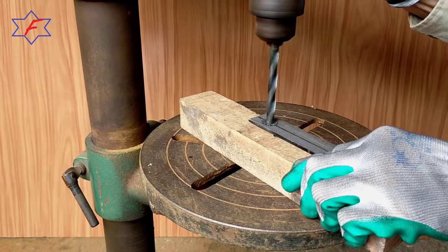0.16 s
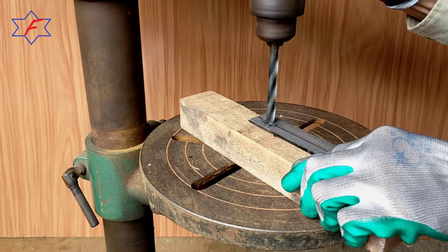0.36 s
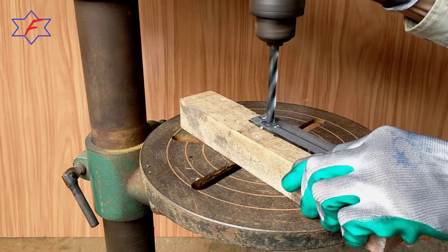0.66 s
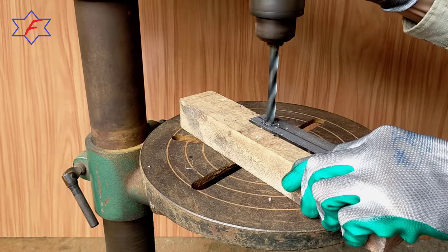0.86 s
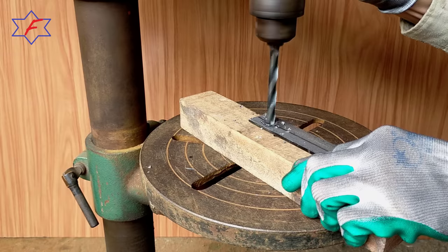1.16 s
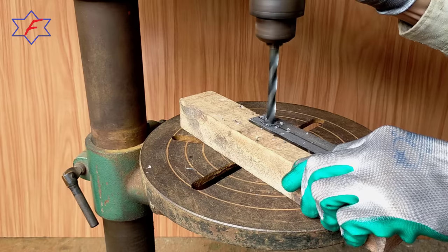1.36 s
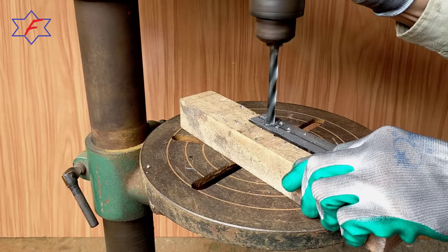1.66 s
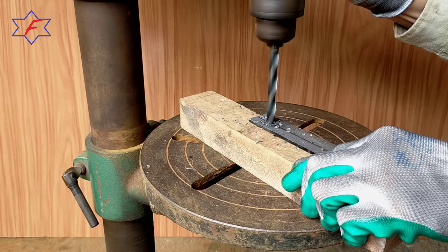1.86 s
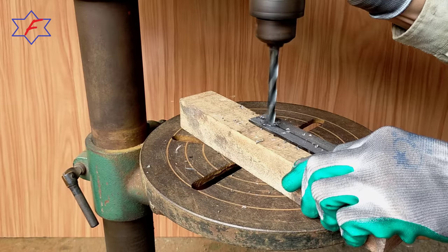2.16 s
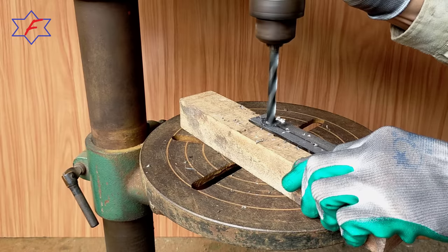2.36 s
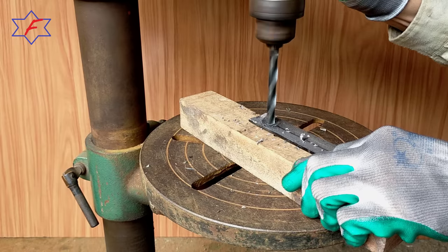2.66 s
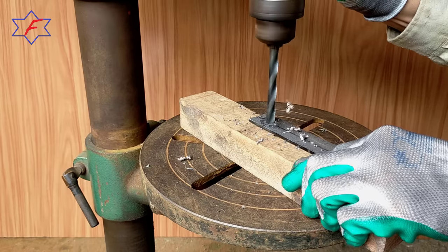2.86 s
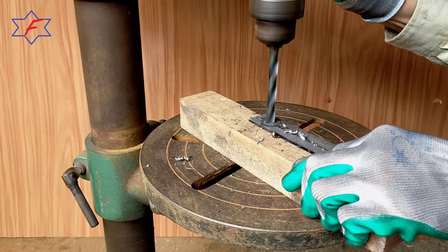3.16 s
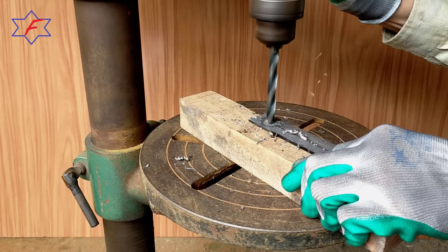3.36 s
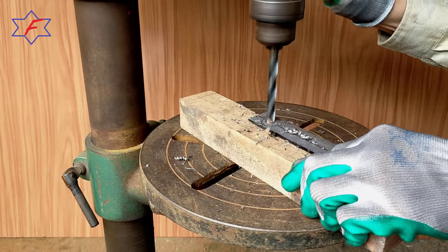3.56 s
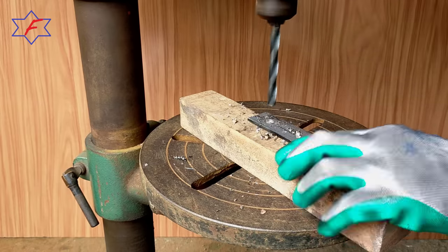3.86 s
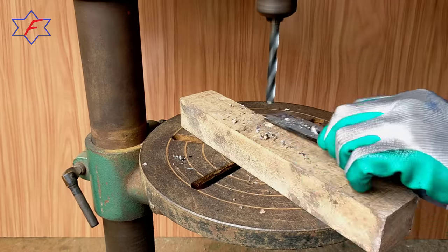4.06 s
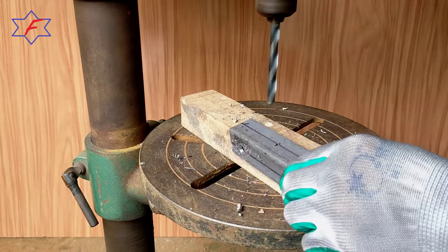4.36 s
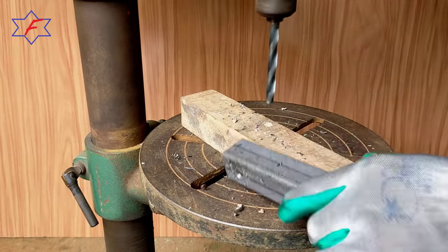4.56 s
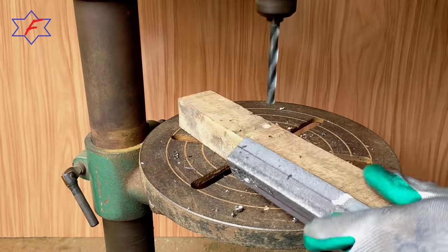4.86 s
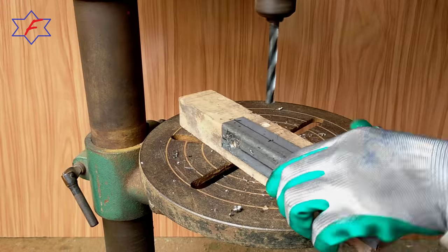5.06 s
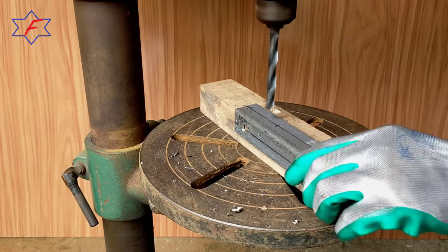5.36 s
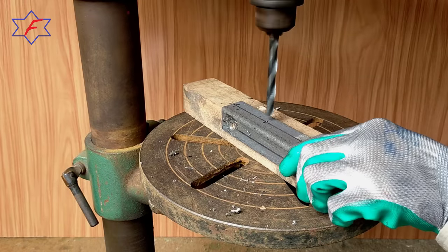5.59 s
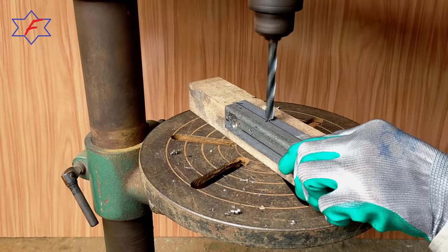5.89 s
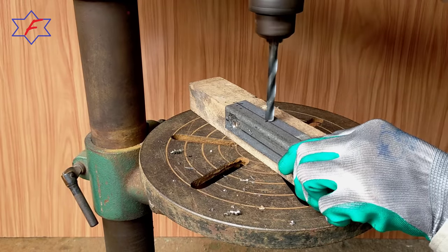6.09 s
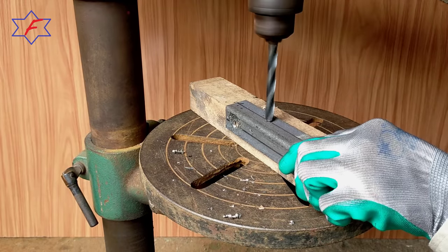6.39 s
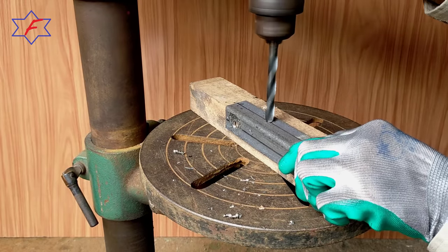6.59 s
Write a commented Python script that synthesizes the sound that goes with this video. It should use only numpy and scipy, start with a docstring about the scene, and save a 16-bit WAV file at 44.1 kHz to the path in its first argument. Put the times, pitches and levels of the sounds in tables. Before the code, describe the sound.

Close up, a drill press knocks and drones rapidly while its bit sizzles into steel, screeches at breakthrough, and keeps rattling freely afterwards.

```python
"""A belt-driven drill press: its loose pulley knocks and its motor ticks once a turn, as random draws
ringing through modal filters, and the knocks throb as the two shafts drift in and out of step.
The guard rattles and the housing drones and sings; noise and rough tones make the bit hiss, squeak and scrape
in a steel bar. The machine then rattles on under little load, and the bar is set down with a chink.
Near walls answer with short decaying noise echoes; low-pitched noise puffs brush one close microphone."""
import sys
import numpy as np
from scipy import signal
from scipy.fft import rfft, irfft, next_fast_len
from scipy.io import wavfile
from scipy.ndimage import uniform_filter1d, map_coordinates

SR = 44100
rng = np.random.default_rng(int(sys.argv[2]) if len(sys.argv) > 2 else 0)


def generate_wav(signal):
    """Clip the signal to [-1, 1] and save it as 16-bit WAV at the path in sys.argv[1]."""
    frames = np.transpose(np.atleast_2d(signal))
    scaled = np.clip(frames, -1, 1) * 32767
    pcm = np.round(scaled).astype(np.int16)
    wavfile.write(sys.argv[1], SR, pcm)


N = 296793

# shaft speeds, sagging under the cut: (time [s], pulley speed [turns/s], motor speed [turns/s])
SPEED = [(0, 40.47, 49.27), (0.7, 40.18, 46.87), (1.5, 40.17, 47.03), (2.3, 40.04, 46.84),
         (2.9, 39.6, 47.08), (3.3, 39.58, 48.1), (3.8, 41.01, 48.1), (4.4, 40.93, 48.14),
         (5.2, 41.0, 48.22), (6, 40.97, 48.14), (6.73, 41.09, 48.24)]
# pressure of the feed on the bit: (time [s], load [0-1])
FEED = [(0, 0.5), (.4, 0.24), (1.5, 0.85), (3.5, 0.48), (3.9, 0.1)]
# how hard the machine shakes, with a brief sharp lull near 3.2 s: (time [s], level [dB])
SHAKE = [(0, -45.5), (.45, -48), (1.5, -50.5), (2.3, -51), (2.75, -51.5), (3, -54.5), (3.125, -57),
         (3.142, -71), (3.27, -60), (3.29, -49), (3.55, -50), (3.73, -47), (6.73, -46.5)]
# moments when the machine runs quieter or louder:
# (centre [s], length [s], clatter change [dB], drone change [dB])
SWINGS = [(0.292, 0.28, -4.5, -1), (.53, 0.14, 0, 2), (0.657, 0.11, -4, 2), (1.32, 0.027, -13, -2),
          (2.55, 0.3, -3, -2), (3.197, 0.12, 2, -9), (3.503, .08, -1.5, -2), (3.792, 0.023, -3.5, -2),
          (4.021, 0.062, -0.5, -7.5), (4.248, 0.074, 0, 2.5), (4.47, 0.051, -5, -4.5),
          (4.611, 0.049, -4, -8), (4.744, 0.026, -10, -13), (5.585, 0.043, -3.5, -4.5),
          (5.827, 0.026, -2.5, -4), (5.977, 0.024, -5.5, -10), (6.218, 0.078, 1, 3), (6.299, 0.009, -5, -6),
          (6.61, 0.054, -2, 1)]
# the knocks that stand out: (time [s], nominal peak [dB])
KNOCKS = [(0.0325, -33), (0.109, -30), (0.2568, -31), (0.281, -31), (0.382, -29.5), (0.406, -29),
          (0.429, -32), (0.4529, -35), (0.5307, -30.5), (0.8054, -31), (0.8285, -32), (0.8514, -32),
          (0.954, -31), (1.0017, -30.5), (1.1027, -35.5), (1.1513, -34), (1.2266, -32.5), (1.2526, -31),
          (1.277, -30.5), (1.2984, -32.5), (1.404, -37), (1.4257, -30), (1.5509, -34.5), (1.6752, -33),
          (1.6995, -33), (1.723, -30.5), (1.8257, -33), (1.8492, -33.5), (1.9983, -29.5), (2.0984, -32),
          (2.1243, -36), (2.149, -31.5), (2.2502, -32.5), (2.2749, -36), (2.2987, -29.5), (2.3217, -35),
          (2.3999, -32.5), (2.4247, -31), (2.55, -33), (2.5725, -32), (2.7004, -33), (2.7239, -29.5),
          (2.748, -30), (2.8435, -36), (2.8743, -34), (3.1825, -37.5), (3.4311, -32), (3.7285, -32.5),
          (3.8541, -32), (3.898, -33.5), (3.9598, -31), (3.9972, -31), (4.144, -29.5), (4.1676, -34),
          (4.29, -28), (4.3134, -31), (4.3866, -31), (4.4126, -33.5), (4.4368, -29), (4.461, -36),
          (4.5341, -30), (4.558, -32.5), (4.583, -29), (4.6787, -32), (4.7047, -37), (4.7293, -32),
          (4.8282, -29), (4.851, -43), (4.9492, -35.5), (5.1444, -32), (5.2661, -30.5), (5.2898, -28.5),
          (5.3878, -29.5), (5.4128, -34), (5.4535, -34), (5.5343, -31), (5.5585, -32.5), (5.657, -32.5),
          (5.8266, -40), (5.911, -32), (5.9497, -31.5), (5.974, -38.5), (5.9981, -32), (6.0571, -30.5),
          (6.095, -35), (6.1584, -31), (6.364, -31.5), (6.4721, -33.5), (6.6563, -31.5)]
# resonances of one knock's clack: (frequency [Hz], width [Hz], level [dB])
CLACK_MODES = [(1546, 206, -2), (2230, 270, 4), (3230, 600, -9)]
# dense weaker modes between those of the clack: (frequency [Hz], level [dB])
CLACK_BED = [(100, -42), (600, -16), (1200, -26), (4500, -8.5), (6500, -12), (8500, -20), (10300, -15),
             (15500, -19)]
# resonances of the pulley cover: (frequency [Hz], width [Hz], level [dB])
COVER_MODES = [(836, 25, -1), (1050, 29, 4.5), (1240, 44, -5.5), (1475, 56, 6), (1650, 110, -5),
               (2020, 140, -6.5), (2310, 140, -3), (3400, 240, -11)]
# dense weaker modes of the cover: (frequency [Hz], level [dB])
COVER_BED = [(100, -54), (500, -20.5), (1500, -41), (4500, -6), (6500, -15), (8500, -15), (10300, -25),
             (15500, -28)]
# resonances of the thin guard: (frequency [Hz], width [Hz], level [dB])
GUARD_MODES = [(1480, 60, -34), (1650, 64, -0.5), (1787, 17, -4.5), (1984, 56, 3.5), (2233, 150, 0),
               (2350, 110, -2), (2560, 97, -14), (2850, 180, 1.5), (3340, 140, 1.5), (3530, 150, -2.5),
               (6100, 190, -6.5), (7950, 54, -6.5)]
# dense weaker modes of the guard: (frequency [Hz], level [dB])
GUARD_BED = [(100, -54), (500, -22.5), (1200, -22), (1600, -5), (2500, -3.5), (3500, -5.5), (4200, -10),
             (5500, -9), (6900, -9.5), (8500, -17), (10300, -12), (11500, -19.5), (15500, -17)]
# resonances of the head casting: (frequency [Hz], width [Hz], level [dB])
HOUSING_MODES = [(376.5, 5.6, -10), (480, 35, -11), (605, 33, -7.5), (680, 74, -8.5), (789, 16, .5),
                 (828, 21, 3), (870, 7, -25), (1022, 30, -3), (1069, 40, -2), (1205, 34, -9.5),
                 (1320, 29, -17), (1510, 66, -4.5)]
# dense weaker modes of the head casting: (frequency [Hz], level [dB])
HOUSING_BED = [(40, -50), (150, -33), (255, -40), (400, -16.5), (700, -21.5), (920, -37), (1300, -21),
               (2200, -10.5), (5000, -59)]
# the motor's whine: (multiple of motor speed [-], level against the drone [dB])
WHINE = [(10, -16), (13, -24), (17, -5), (22, -26)]
# resonances of the bit on the bar: (frequency [Hz], width [Hz], level [dB])
BIT_MODES = [(1910, 71, 2), (3486, 370, 1), (4490, 84, -6), (5183, 146, 2), (6400, 160, -1), (6430, 160, 1),
             (7190, 210, -4.5), (7890, 140, -5), (9346, 102, 1.5), (9740, 330, -4), (10270, 290, -11.5),
             (12260, 210, -8), (14900, 510, -28)]
# dense weaker modes of the bit: (frequency [Hz], level [dB])
BIT_BED = [(300, -58), (1500, -54), (3500, -8), (4200, -36), (5600, -3), (7300, -13), (8600, -60),
           (10500, -3), (11300, -28), (15500, -10)]
# spectrum of the bright tearing sizzle: (frequency [Hz], level [dB])
TEAR = [(3500, -50), (5000, -5), (6900, 3), (8500, -15), (9400, 2), (10600, -3), (11400, -20), (15500, -10)]
# bit resonances that squeal: (frequency [Hz], nominal level [dB])
SQUEAL = [(5175, -59), (6470, -56.5)]
# steel rubbing on steel: the tip skims, the flutes rub in the hole, the bit skims the bar:
# (start [s], rise [s], end [s], release [s], level [dB])
SCRAPES = [(.08, 0.032, 0.36, .02, -56), (2.6, 0.33, 4, .04, -55), (2.8, 0.2, 2.9, 0.0071, -50.5),
           (3.18, 0.0066, 3.45, 0.12, -51), (3.27, 0.07, 3.3, 0.17, -46.5), (3.56, 0.04, 3.84, 0.06, -54),
           (6, 0.2, 7.1, .3, -60)]
# spectrum of rubbing steel in a deep hole: (frequency [Hz], level [dB])
RUB = [(800, -38), (3400, -2.5), (4100, -9), (4650, 3.5), (5200, 8), (5700, 4), (6400, 3), (7100, 3),
       (7800, -10.5), (10000, -6.5), (13400, -12), (15500, -9)]
# pitch of the rubbing against that in a deep hole: (time [s], ratio [-])
CLIMB = [(0, 0.6), (2.1, 0.96), (3.1, 1), (3.22, 0.98), (3.35, 0.97), (3.46, 0.99), (3.6, 0.88),
         (3.76, 0.75), (6.1, 0.62)]
# moments when the edge snatches at the steel: (centre [s], length [s], level [dB])
SNATCHES = [(0.127, 0.013, -48.5), (0.179, 0.017, -49), (0.387, 0.0064, -39), (0.842, 0.034, -50.5),
            (1.001, 0.012, -45), (1.175, 0.12, -51.5), (3.187, 0.0035, -48), (3.585, 0.011, -47),
            (3.731, .006, -42), (3.761, 0.019, -44), (6.421, 0.029, -47)]
# spectrum of a snatch: (frequency [Hz], level [dB])
SNATCH = [(500, -22.5), (1400, -16), (3200, -1), (5000, -2.5), (7000, -11.5), (15500, -21)]
# the loudest squeaks of chips and steel: (time [s], nominal peak [dB], mean pitch [Hz])
SQUEAKS = [(2.384, -33.5, 6400), (2.8887, -33.5, 9700), (2.9114, -38, 5000), (2.9405, -48, 6400),
           (2.987, -36, 9500), (3.008, -36, 10400), (3.7687, -39, 12700)]
# decay of the near walls' answer: (frequency [Hz], t60 [s])
ROOM = [(200, 0.26), (2000, 0.063), (12000, 0.033)]
# puffs of air on the microphone: (centre [s], length [s], level [dB])
PUFFS = [(.19, 0.068, -80), (0.32, 0.04, -70), (1.453, 0.1, -79), (2.003, 0.088, -72), (2.1, 0.027, -63),
         (2.184, 0.037, -64), (2.282, .06, -78), (3.454, 0.13, -71.5), (3.853, 0.1, -77),
         (4.773, 0.074, -79.5), (5.083, 0.096, -71.5), (5.25, .13, -75), (6.38, 0.17, -71.5)]
# spectrum of the moving air: (frequency [Hz], level [dB])
AIR = [(15, -9), (45, 1.5), (100, -3), (200, 1), (350, -3.5), (800, -28), (3000, -91)]

KNOCK_DB, KNOCK_LOAD_DB = -1.5, 1.5  # ordinary knocks against the shaking; change at full load
THROB_DB, THROB_LOAD_DB = 2, 4.5  # swing of the knocks with the shafts' step; change at full load
PULL_TURNS = 0.027  # a leading motor brings the knock forward, a lagging one holds it back
KNOCK_CREST_DB = 10  # peak of a knock over its level
CLACK_S, CLACK_SCATTER = 0.0011, 0.058  # time to the peak of the contact; spread of pitch (share)
COVER_DB, COVER_LOAD_DB = -10.5, 4.5  # cover chatter against the clack; change at full load
DULL_HZ, DULL_DB = 2760, 2  # under load the knock loses treble above this and gains weight
TICK_DB, TICK_LOAD_DB, TICK_SCATTER_DB = -2.5, -6, 4  # against the shaking; load change; unevenness
RATTLE_DB, RATTLE_LOAD_DB = 0.62, -3.3  # guard rattle against the shaking; change at full load
RATTLE_THROB = 0.2  # share of the knocks' swing in the rattle
DRONE_DB, DRONE_FOLLOWS = -56, 0.56  # nominal level at the hardest shaking; dB per dB of shaking
DRONE_THROB_DB = 4  # scale of the drone's swing with the shafts
WHINE_LOAD_DB = -5  # change at full load
SING_HZ, SING_DRIFT_TURNS = 830, 0.15  # the housing's singing tone; unsteadiness of its phase
SING_DB, SING_LOAD_DB, SING_WAVER_DB = -7.5, 4, 6.5  # against the drone; load change; unsteadiness

BITE_S, ENTRY_S, ENTRY_DB = 0.12, 0.22, 14  # the tip touches, starting this much weaker until it sinks in
CUT_DB, THROUGH_S, CUT_RELEASE_S = -47, 3.133, 0.0033  # nominal full cut; the tip is through; release
THIN_S, THIN_LENGTH_S, THIN_DB = 3.24, 0.18, -8.5  # the last thin skin of steel rings the bit less
TRIM_DB, TRIM_END_S, TRIM_RELEASE_S = -56.5, 3.27, 0.062  # the edges go on trimming the hole's rim
TEAR_S, TEAR_LENGTH_S, TEAR_DB = 2.95, 0.2, -48  # centre, length and level of the tearing
BIT_WANDER = 0.00308  # share by which the bit's resonances shift as its grip in the hole changes
SQUEAL_SPURT_DB, SQUEAL_GROWS_DB_PER_S = 8, 7.5  # unevenness; growth until the tip is through
RUB_THROB_DB = -1.5  # the rubbing throbs once a motor turn
BURR_S = (2.78, 3.29)  # the burr catches once a motor turn between these times
BURR_HZ, BURR_DB, BURR_SCATTER_DB = (9600, 11700), (-50, -53), 5.5  # first and last; unevenness
CHINK_S, CHINK_HZ, CHINK_DB, CHINK_T60_S = 5.047, 5530, -33.5, 0.042  # the bar is set down again
ROOM_DB, DRAUGHT_DB = -9.5, -94  # wall echoes against the direct sound; faint air between the puffs
TOP_HZ = 15700  # upper band limit


def shafts():
    """Phase is the integral of speed: turns of each shaft, and the cosine of their phase difference."""
    start_turns = [[.56], [.35]]
    pulley, motor = np.cumsum(curves(SPEED), axis=1) / SR + start_turns
    return pulley, motor, np.cos(2 * np.pi * (motor - pulley))


def drive(pulley, motor, in_step):
    """Beating of two shafts: knocks, ticks, rattle and drone share one shaking level and one load."""
    shake_db, = curves(SHAKE)
    load, = curves(FEED)
    clatter_db = shake_db + sum(db * bell(s, length) for s, length, db, _ in SWINGS)
    drone_db = DRONE_DB + DRONE_FOLLOWS * (shake_db - shake_db.max())
    drone_db = drone_db + sum(db * bell(s, length) for s, length, _, db in SWINGS)
    # feed pressure gathers the knocks into clear groups; without it the guard rattles loosely
    throb_db = (THROB_DB + THROB_LOAD_DB * load) * np.tanh(2 * in_step + .5)
    knock_db = clatter_db + KNOCK_DB + KNOCK_LOAD_DB * load + throb_db
    knocks = dulled(pulley_knocks(pulley, motor, knock_db, load), load)
    ticks = guard_ticks(motor, clatter_db + TICK_DB + TICK_LOAD_DB * load)
    rattle = guard_rattle(motor, clatter_db + RATTLE_DB + RATTLE_LOAD_DB * load, throb_db)
    step_db = DRONE_THROB_DB * (-0.16 + 0.5 * load) * in_step
    drone = amp(drone_db + step_db) * (housing_drone(pulley, throb_db) + whine(motor, load))
    return knocks + ticks + rattle + drone


def pulley_knocks(pulley, motor, level_db, load):
    """Impact excitation: one clack a turn, some much harder, each followed by the cover's modal chatter."""
    hard_s, peak_db = np.transpose(KNOCKS)
    at = each_turn(pulley + PULL_TURNS * np.sin(2 * np.pi * (motor - pulley)))
    # an ordinary knock gives way to a hard one within 12 ms
    at = at[np.abs(at[:, None] / SR - hard_s).min(axis=1) > .012]
    times = np.r_[hard_s, at / SR]
    db = np.r_[peak_db - KNOCK_CREST_DB, level_db[at] + rng.standard_normal(len(at))]
    settling = bursts(times, amp(db + COVER_DB), life=0.0067, chatter_db=-2,
                      chatter_life=0.0089, rise=0.0057)
    chatter = amp(COVER_LOAD_DB * load) * settling * rng.standard_normal(N)
    return clacks(times, db, response(CLACK_BED, CLACK_MODES)) + body(chatter, COVER_BED, COVER_MODES)


def dulled(x, load):
    """Damping by tension: the taut belt takes the treble from the knocks as the load rises."""
    low = signal.sosfiltfilt(signal.butter(2, DULL_HZ, fs=SR, output="sos"), x)
    share = np.clip(load, 0, 1)
    return (1 - share) * x + share * amp(DULL_DB) * low


def guard_ticks(motor, level_db):
    """Periodic impact on a thin plate: one uneven tick in every motor turn rings the guard."""
    at = each_turn(motor)
    uneven_db = TICK_SCATTER_DB * np.minimum(rng.standard_normal(len(at)), 1.5)
    return clacks(at / SR, level_db[at] + uneven_db, response(GUARD_BED, GUARD_MODES))


def guard_rattle(motor, level_db, throb_db):
    """Modal response to loose contact: clumpy noise, stronger at each motor turn, rings the guard."""
    motor_hits = once_a_turn(motor, np.ones(N), scatter_db=1.2, life=.002, chatter_db=-7)
    looseness = amp(RATTLE_THROB * throb_db + 0.64 * wobble(17)) * np.hypot(0.16 * motor_hits, .85)
    rattle = amp(level_db) * looseness * grit(spread_db=1.77, rate=450)
    return body(rattle, GUARD_BED, GUARD_MODES)


def housing_drone(pulley, throb_db):
    """Forced vibration: noise swelling at each pulley knock drives the modes of the casting."""
    pulley_hits = once_a_turn(pulley, amp(throb_db), scatter_db=1, life=.003, chatter_db=-4.5)
    shudder = unit((1 + 0.33 * pulley_hits) * rng.standard_normal(N))
    return body(shudder, HOUSING_BED, HOUSING_MODES)


def whine(motor, load):
    """Harmonics of rotation, weaker under load, beside a housing resonance that sings louder under it."""
    turns = motor + .009 * wobble(14)
    orders = np.zeros(N)
    for order, db in WHINE:
        tone = np.sin(2 * np.pi * (order * turns + rng.random()))
        orders += amp(db + 2.4 * wobble(12)) * tone
    sing_db = SING_DB + SING_LOAD_DB * load + SING_WAVER_DB * np.minimum(wobble(28), 1)
    sing_turns = SING_HZ * np.arange(N) / SR + SING_DRIFT_TURNS * wobble(22)
    return amp(WHINE_LOAD_DB * load) * orders + amp(sing_db) * np.sin(2 * np.pi * sing_turns)


def cutting(motor):
    """Brittle fracture: tiny chip breaks ring the bit's modes; trimming and a tearing sizzle join them."""
    sunk_s = np.maximum(np.arange(N) / SR - BITE_S, 0)
    cut_db = CUT_DB - ENTRY_DB * np.exp(-sunk_s / ENTRY_S) + THIN_DB * bell(THIN_S, THIN_LENGTH_S)
    uneven_db = .8 * wobble(22)
    feed = amp(uneven_db + 1.16 * np.cos(2 * np.pi * motor))
    contact = stroke(BITE_S, .04, THROUGH_S, CUT_RELEASE_S)
    trim = amp(TRIM_DB) * stroke(THROUGH_S, 0.061, TRIM_END_S, TRIM_RELEASE_S)
    fractures = np.hypot(amp(cut_db) * contact, trim) * feed * grit(spread_db=2.0, rate=450)
    ringing = glide(body(fractures, BIT_BED, BIT_MODES), 1 + BIT_WANDER * wobble(25))
    tearing = amp(TEAR_DB) * bell(TEAR_S, TEAR_LENGTH_S) * contact * grit(spread_db=3.0, rate=400)
    return ringing + body(tearing, TEAR)


def squealing():
    """Stick-slip oscillation: the edge rings two bit resonances in spurts, growing as the hole deepens."""
    t = np.arange(N) / SR
    notes = np.zeros(N)
    for hz, db in SQUEAL:
        spurts = amp(db + SQUEAL_SPURT_DB * np.minimum(wobble(70), 2))
        notes += spurts * np.sin(2 * np.pi * (hz * t + 0.18 * wobble(130)))
    growth = amp(SQUEAL_GROWS_DB_PER_S * np.minimum(t - THROUGH_S, 0))
    return growth * stroke(BITE_S, 0.33, THROUGH_S, CUT_RELEASE_S) * notes


def scraping(motor):
    """Friction noise: steel rubs on steel, its pitch following the CLIMB curve up and down again."""
    pitch, = curves(CLIMB)
    pressure = np.sqrt(sum((amp(db) * stroke(*timing)) ** 2 for *timing, db in SCRAPES))
    judder = amp(RUB_THROB_DB * np.cos(2 * np.pi * motor) + 1.8 * wobble(60))
    rubbing = glide(body(grit(spread_db=1.5, rate=250), RUB), pitch)
    return pressure * unit(judder * rubbing)


def snatching():
    """Abrupt release: the edge grabs and tears free in short harsh rasps of clumpy noise."""
    grabs = sum(amp(db) * bell(s, length) for s, length, db in SNATCHES)
    return body(grabs * grit(spread_db=7.0, rate=1100), SNATCH)


def squeaks(motor):
    """Stick-slip of chips and burr: each squeak is a few milliseconds of one frequency-modulated note."""
    out, t = np.zeros(N + SR), np.arange(SR // 30) / SR
    rise = .0007  # s
    envelope = t / rise * np.exp(1 - t / rise)
    for s, db, hz in list(SQUEAKS) + burr(motor):
        roughness = unit(uniform_filter1d(rng.standard_normal(len(t)), size=16))
        pitch = hz * (1 + .05 * roughness)
        out[round(s * SR):][:len(t)] += amp(db) * envelope * np.sin(2 * np.pi * np.cumsum(pitch) / SR)
    return out[:N]


def burr(motor):
    """Periodic catching: squeak rows, one a motor turn, higher and on average fainter as the burr wears."""
    times = each_turn(motor) / SR
    times = times[(times > BURR_S[0]) & (times < BURR_S[1])]
    rows = []
    for s in times:
        db = np.interp(s, BURR_S, BURR_DB) + BURR_SCATTER_DB * rng.standard_normal()
        rows.append((s, db, np.interp(s, BURR_S, BURR_HZ)))
    return rows


def chink():
    """Damped free vibration: the steel bar rings briefly on one note, damped by the glove."""
    t = np.maximum(np.arange(N) / SR - CHINK_S, 0)
    decay = amp(CHINK_DB - 60 * t / CHINK_T60_S) * (1 - np.exp(-t / 0.0016))
    return decay * np.sin(2 * np.pi * (CHINK_HZ * t + 0.16 * wobble(200)))


def room(x):
    """Reverberation: near walls answer, the treble dying first, in overlapping fresh noise tails."""
    hop = SR // 4
    padded, out = np.pad(x, (hop, 2 * hop)), np.zeros(N + 2 * SR)
    window = signal.windows.cosine(2 * hop)
    for start in range(0, N + hop, hop):
        # a fresh noise tail for each overlapping half second
        hz, t, z = signal.stft(rng.standard_normal(hop), SR, nperseg=256)
        decay = amp(-60 * t / along(ROOM, hz)[:, None])
        tail = signal.istft(z * decay, SR, nperseg=256)[1]
        echo = signal.fftconvolve(padded[start:start + 2 * hop] * window, tail / np.linalg.norm(tail))
        out[start + SR // 700:][:len(echo)] += echo
    return out[hop:hop + N]


def air():
    """Turbulent pressure: soft low puffs of noise on the microphone, over a faint draught."""
    flow = amp(DRAUGHT_DB) + sum(amp(db) * bell(s, length) for s, length, db in PUFFS)
    return flow * body(grit(spread_db=3.5, rate=41), AIR)


def each_turn(turns):
    """Phase crossing: the samples at which a shaft completes a turn."""
    return np.flatnonzero(np.diff(np.floor(turns)))


def once_a_turn(turns, strength, scatter_db, life, chatter_db):
    """Periodic impact: envelope (rms 1) of a loose part that knocks once in every turn."""
    at = each_turn(turns)
    sizes = strength[at] * amp(scatter_db * rng.standard_normal(len(at)))
    return unit(bursts(at / SR, sizes, life, chatter_db, chatter_life=.008, rise=.0007))


def bursts(times, sizes, life, chatter_db, chatter_life, rise):
    """Energy decay in two stages: the envelope of a crack, then a chatter as the parts settle."""
    t = np.arange(SR // 10) / SR
    hits = np.bincount(np.clip(times * SR, 0, N).astype(int), sizes ** 2, N + 1)
    decay = np.exp(-2 * t / life) + amp(chatter_db) ** 2 * np.exp(-2 * t / chatter_life)
    shape = decay * (1 - np.exp(-t / rise)) ** 2
    return np.sqrt(np.abs(signal.fftconvolve(hits, shape / shape.max())[:N]))


def clacks(times, level_db, ring, size=1024):
    """Impulsive contact: noisy pulses ring a body, each at its own pitch, levelled over about 4 ms."""
    out, n = np.zeros(N + SR), np.arange(size)
    u = n / SR / CLACK_S
    for s, db, draw in zip(times, level_db, rng.standard_normal((len(times), size + 1))):
        clack = signal.fftconvolve(u * np.exp(-u) * draw[1:], ring[:size])
        # reading it faster or slower shifts its pitch
        clack = np.interp(n * np.exp(CLACK_SCATTER * draw[0]), np.arange(len(clack)), clack)
        out[max(round(s * SR), 0):][:size] += amp(db) * clack / np.std(clack[:SR // 250])
    return out[:N]


def response(bed, modes=(), size=8192):
    """Minimum phase: the causal ring of a body, of unit energy, its resonances on a broad bed."""
    hz = np.fft.rfftfreq(size, 1 / SR)
    power = amp(along(bed, hz)) ** 2
    for centre, width, db in modes:
        damping = (hz * width) ** 2
        power = power + amp(db) ** 2 * damping / ((centre ** 2 - hz ** 2) ** 2 + damping)
    # folding the cepstrum onto positive times makes the ring causal
    cepstrum = irfft(np.log(power) / 2)
    cepstrum[1:size // 2] *= 2
    cepstrum[size // 2 + 1:] = 0
    ring = irfft(np.exp(rfft(cepstrum)))
    return ring / np.linalg.norm(ring)


def body(x, bed, modes=()):
    """Linear filtering: x convolved with the ring of a body."""
    return signal.fftconvolve(x, response(bed, modes))[:N]


def glide(x, pitch):
    """Time warping: x with all its resonances moved by the ratio pitch."""
    return map_coordinates(x, [np.cumsum(pitch)], mode="wrap")


def grit(spread_db, rate):
    """Amplitude modulation: noise of rms 1 that comes in tiny uneven clumps."""
    return unit(rng.standard_normal(N) * amp(spread_db * np.minimum(wobble(rate), 2)))


def wobble(rate):
    """Random modulation: a smooth curve, rate knots a second."""
    return map_coordinates(rng.standard_normal(int(N * rate / SR) + 4), [np.arange(N) * rate / SR])


def bell(centre, length):
    """Gaussian envelope: a hump of height 1, about length seconds wide."""
    return np.exp(-2 * ((np.arange(N) / SR - centre) / length) ** 2)


def stroke(start, rise, end, release):
    """Contact envelope: a linear rise, a hold until end and an exponential decay."""
    t = np.arange(N) / SR
    return np.clip((t - start) / rise, 0, 1) * np.exp(-np.maximum(t - end, 0) / release)


def curves(rows):
    """Linear interpolation: one value per sample for each column after the time."""
    s, *cols = np.transpose(rows)
    return [np.interp(np.arange(N) / SR, s, c) for c in cols]


def along(points, hz):
    """Logarithmic frequency scale: (frequency [Hz], value) points joined on a log axis."""
    f, v = np.transpose(points)
    return np.interp(np.log(hz + 1), np.log(f + 1), v)


def amp(db):
    """Decibel law: decibels to gain."""
    return 10 ** (np.asarray(db) / 20)


def unit(x):
    """Power normalisation: x at rms 1."""
    return x / np.sqrt(np.mean(x ** 2) + 1e-20)


def scene():
    """Superposition: machine, cut, wall echoes and air at one microphone, the same in both channels."""
    pulley, motor, in_step = shafts()
    machine = drive(pulley, motor, in_step)
    cut = cutting(motor) + squealing() + scraping(motor) + snatching() + squeaks(motor)
    press = machine + cut + chink()
    mono = press + amp(ROOM_DB) * room(press) + air()
    return np.array([mono, mono])


def record(dry):
    """Band limitation: nothing above TOP_HZ is kept."""
    size = next_fast_len(N + SR // 2)
    passband = np.fft.rfftfreq(size, 1 / SR) < TOP_HZ
    return irfft(rfft(dry, size) * passband, size)[:, :N]


dry = scene()
out = record(dry)
generate_wav(out)
```